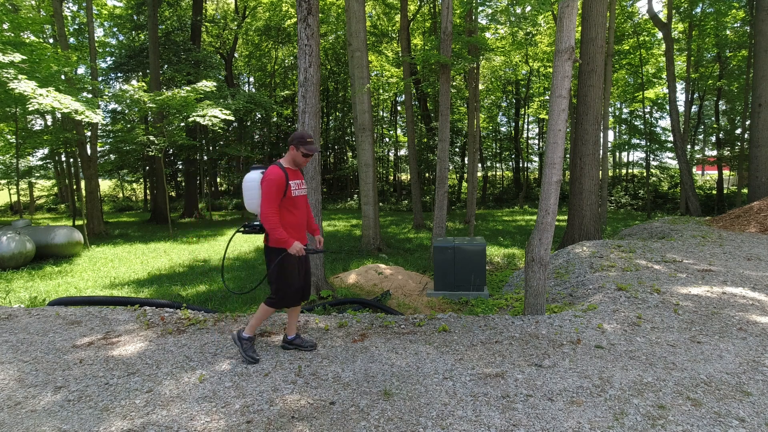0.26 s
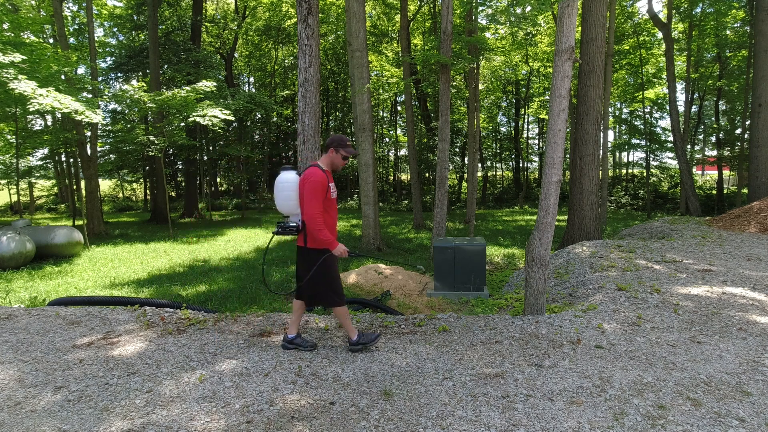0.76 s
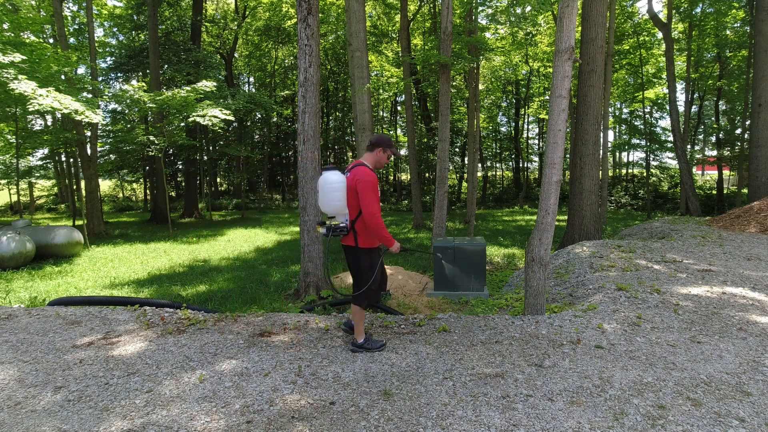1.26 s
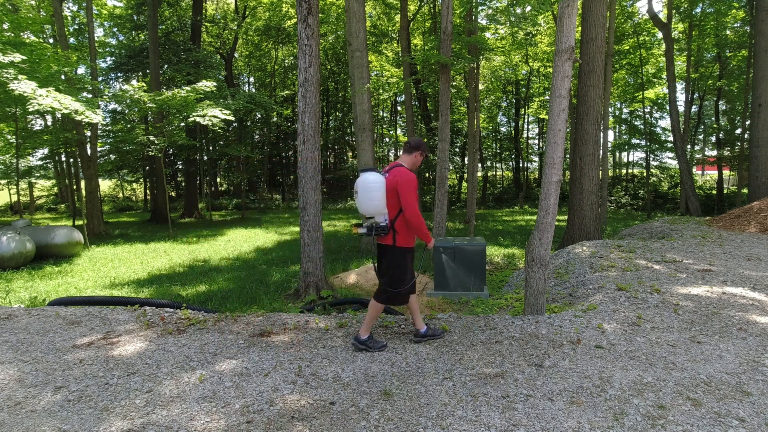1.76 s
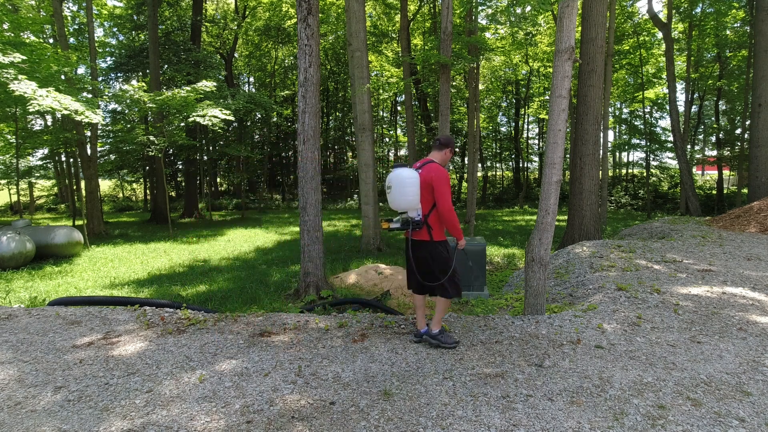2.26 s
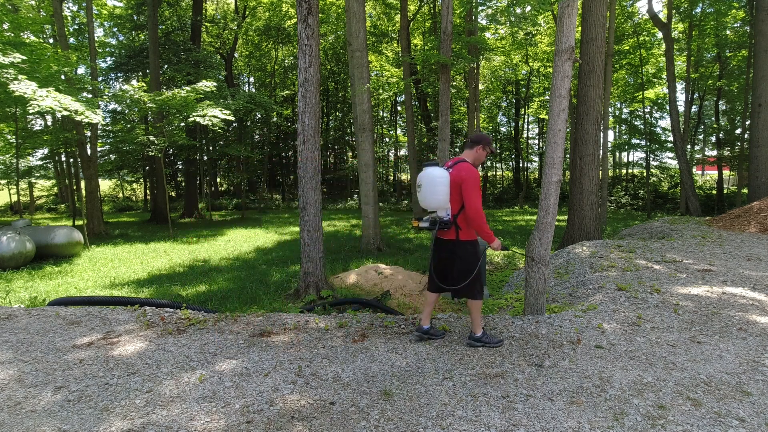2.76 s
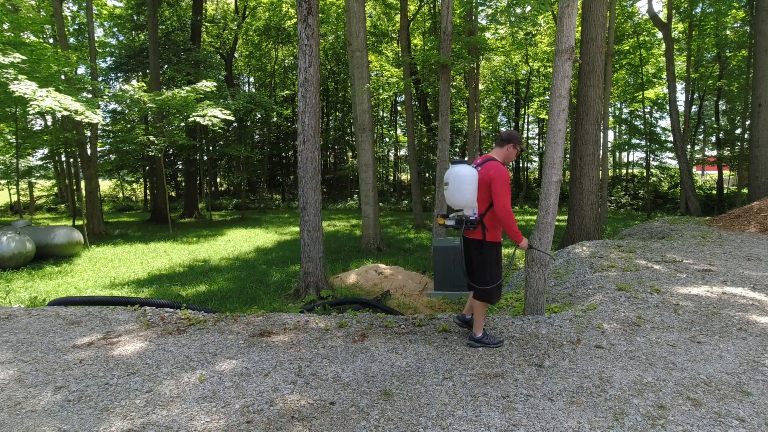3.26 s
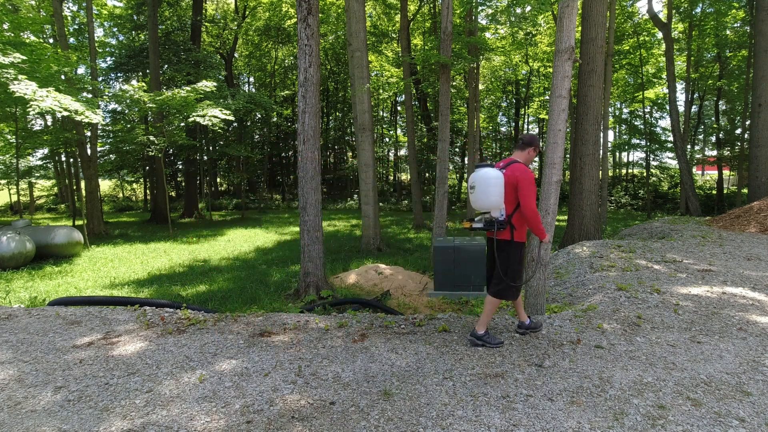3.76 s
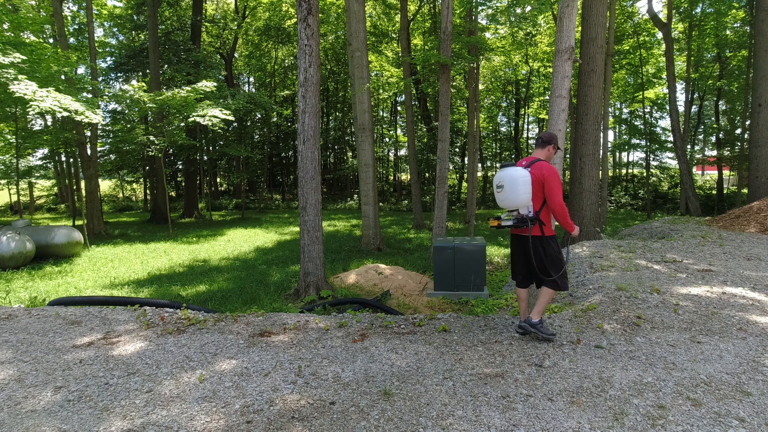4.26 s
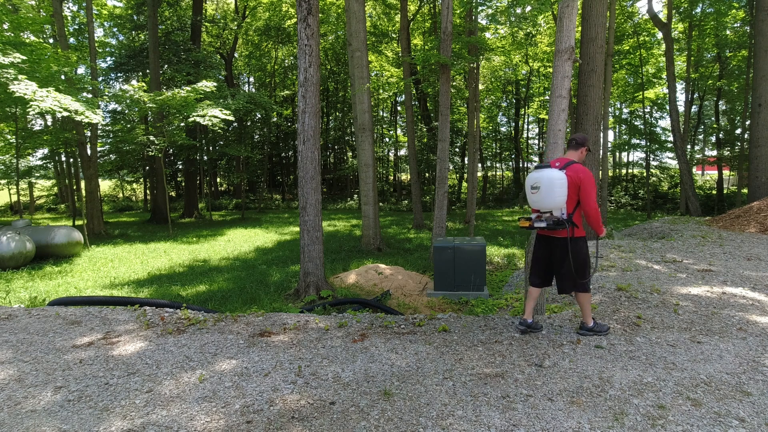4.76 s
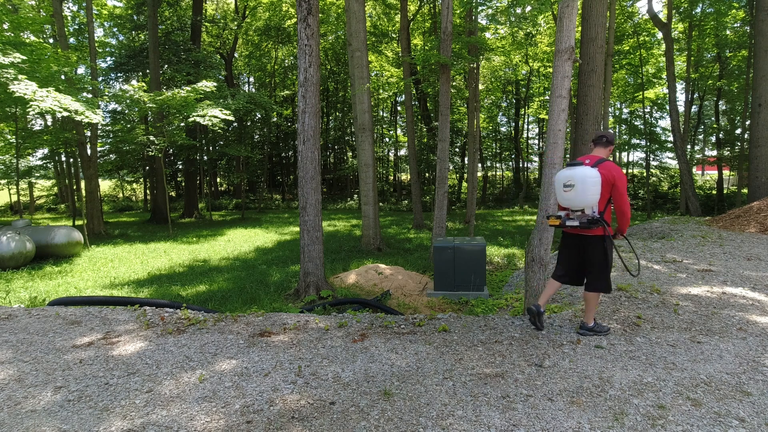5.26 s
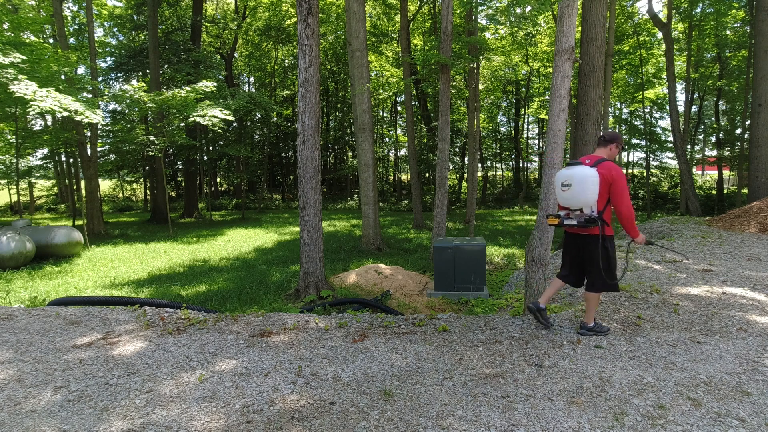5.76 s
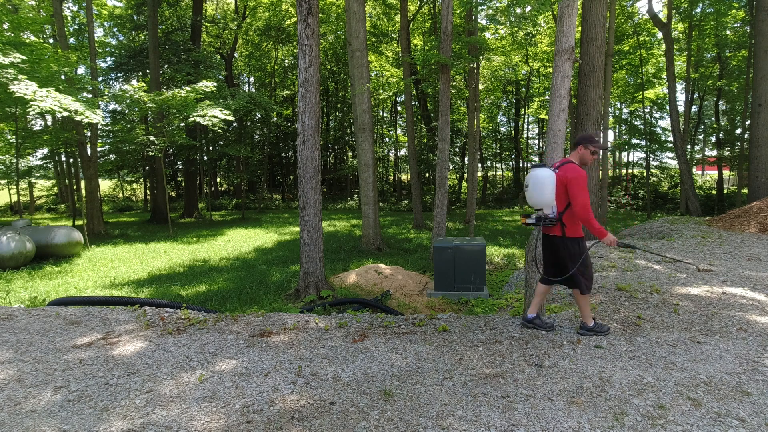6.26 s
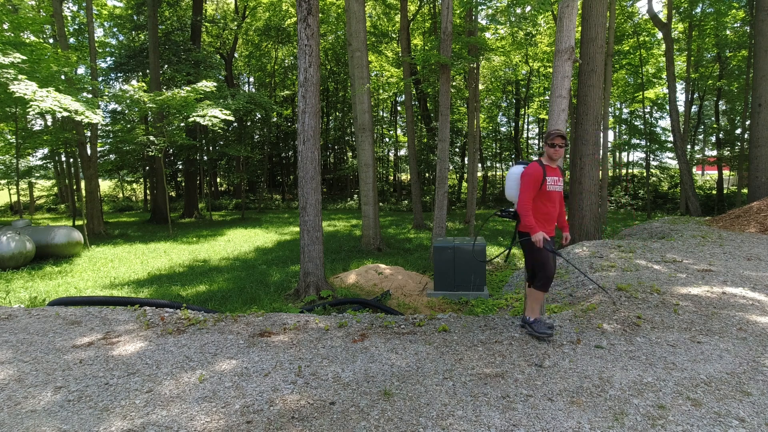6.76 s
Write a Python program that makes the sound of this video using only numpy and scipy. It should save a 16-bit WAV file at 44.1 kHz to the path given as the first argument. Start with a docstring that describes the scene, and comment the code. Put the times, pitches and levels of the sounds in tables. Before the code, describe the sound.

Already running at the start, an electric diaphragm pump drones beside airy, patchy spray. Sharp gravel ticks and grainy scuffs mark walking. The motor drops out for under half a second amid rattling plastic and brief spurts, then resumes, with more knocks as it settles. It finally shuts off together with the hiss, leaving faint low outdoor rumble. Close and dry, with only a slight smeared echo from tree trunks.

```python
"""A small pump hums and spray hisses from the first moment; the pump stops, restarts and stops again.
It sits in a backpack sprayer carried over gravel among trees. Tones tied to its turning shaft make the hum.
Bands of flickering noise make the spray and the distant air, short noise bursts the crunch of shoes.
Short dying rings make the wand and trigger knocks on plastic, clumped clicks the shifting straps."""
import sys
import numpy as np
from scipy import signal
from scipy.io import wavfile
from scipy.ndimage import uniform_filter1d

SR = 44100
rng = np.random.default_rng(int(sys.argv[2]) if len(sys.argv) > 2 else 0)


def to_wav(sig):
    """Store sig (one row per channel, or 1-D mono) as 16-bit WAV at the path in sys.argv[1].

    Samples outside -1..1 are clipped; the rate is SR.
    """
    pcm = np.clip(np.atleast_2d(sig), -1, 1) * 32767
    pcm = np.round(pcm).astype(np.int16)
    wavfile.write(sys.argv[1], SR, pcm.T)  # frames by channels


def convert_level_to_amplitude(level_db):
    """Map a level in decibels to its linear amplitude factor."""
    exponent = np.asarray(level_db, float) / 20
    return 10 ** exponent


N = 309572


def rms_one(x):
    """Scale a sound to an rms of 1."""
    return x / np.sqrt(np.mean(x ** 2) + 1e-20)


def in_time(rows):
    """Draw straight lines between table rows; the first column is t/s."""
    s, *columns = np.transpose(rows)
    return [np.interp(np.arange(N) / SR, s, column) for column in columns]


def at_hz(points, hz):
    """Read a table of (f/Hz, level/dB) at any frequency, along a log scale."""
    table_hz, table_db = np.transpose(points)
    return np.interp(np.log(hz), np.log(table_hz), table_db)


def drift(rate_hz):
    """Slow random wandering of spread 1: noise at every 20th sample, smoothed twice."""
    r = np.exp(-40 * np.pi * rate_hz / SR)
    noise = rng.standard_normal(N // 20 + 3002)
    slow = signal.lfilter([1], [1, -2 * r, r * r], noise)[3000:]  # skip the settling part
    return np.interp(np.arange(N) / 20, np.arange(len(slow)), rms_one(slow - slow.mean()))


def band(x, low_hz, high_hz):
    """Keep the part of a sound between two frequencies."""
    edges_hz = [low_hz, min(high_hz, .45 * SR)]
    return signal.sosfilt(signal.butter(2, edges_hz, "band", fs=SR, output="sos"), x)


def swell(s, half_s):
    """A smooth bump in time."""
    return np.exp(-((np.arange(N) / SR - s) / half_s) ** 2)


def add(out, s, burst):
    """Mix a short sound in at a given second."""
    i = round(s * SR)
    out[..., i:i + burst.shape[-1]] += burst[..., :N - i]


# how wide noise spreads left to right: (f/Hz, level/dB of side over mid)
SIDE_WIDTH = [(2000, -37), (2500, -24), (4400, -0.5), (8100, -10.5), (15000, -5.5)]


def noise_bands(spectrum, edges, flicker_db, flicker_rate, humps=(), lean_db=0):
    """Mid and side noise in bands that flicker separately, shaped by humps; mid rms about 1 each quarter second."""
    out = 0
    white = rng.standard_normal((2, 2, N))
    for k, (low, high) in enumerate(zip(edges, edges[1:])):
        hz = np.sqrt(low * high)
        lift = lean_db * np.log2(hz / 8000)
        for centre, width, db in humps:
            lift = lift + db * np.exp(-(np.log(hz / centre) / width) ** 2)
        gain = convert_level_to_amplitude(at_hz(spectrum, hz) + lift + flicker_db * drift(flicker_rate))
        mid_and_side = convert_level_to_amplitude(np.array([[0], [at_hz(SIDE_WIDTH, hz)]]))
        out = out + gain * band(white[k % 2], low, high) * mid_and_side
    return out / np.sqrt(uniform_filter1d(out[0] ** 2, size=SR // 4))


AIR_DB = -51.5  # mid rms
# colour of far traffic and leaves: (f/Hz, relative level/dB per Hz)
AIR_COLOUR = [(18, -41), (30, -8.5), (86, -5), (113, 2.5), (131, -11.5), (210, -1), (284, -18.5),
              (601, -17.5), (1220, -17.5), (1540, -22), (5000, -45), (6500, -72), (11000, -120)]


def distant_air():
    """Far traffic and leaves blend into a low, gently flickering rumble of noise."""
    edges_hz = np.geomspace(25, 5000, 16)
    return convert_level_to_amplitude(AIR_DB) * noise_bands(AIR_COLOUR, edges_hz, flicker_db=.6, flicker_rate=8.0)


def trees(x, level_db, t60):
    """Trunks scatter a faint, smeared tail of the sound back."""
    t = np.arange(round(.3 * SR)) / SR
    tail = band(rng.standard_normal(len(t)), 564, 3800) * convert_level_to_amplitude(-60 * t / t60) * (t > .015)
    tail = tail / np.sqrt(np.sum(tail ** 2))
    return convert_level_to_amplitude(level_db) * signal.fftconvolve(x, tail)[:N]


# straps and hose shift: (middle t/s, level/dB at the middle, half length t/s)
CREAKS = [(2.499, -38.5, 0.011), (2.6, -47, 0.056), (2.632, -48, 0.03), (2.695, -41.5, 0.016),
          (2.833, -43, 0.04), (3.02, -43, 0.076), (3.153, -45, 0.046), (6.52, -46.5, 0.17)]


def creak():
    """Straps and hose shift on the tank: clumps of dense clicks ring a dull shell."""
    clicks_per_s = 1100 * convert_level_to_amplitude(5.0 * drift(30))
    born = rng.random(N) < clicks_per_s / SR
    strength = convert_level_to_amplitude(2.8 * np.minimum(rng.exponential(1, N), 4))
    clicks = born * strength * rng.choice([-1, 1], N) + 1e-18
    shell = band(clicks, 980, 1120) + 1.4 * band(clicks, 380, 420) + 0.29 * band(clicks, 710, 2500)
    swells = sum(convert_level_to_amplitude(db) * swell(s, half_s) for s, db, half_s in CREAKS)
    return swells * rms_one(shell)


# shoes scuff the gravel: (middle t/s, level/dB before the graininess, half length t/s, centre f/Hz)
SHOE_SCUFFS = [(0.498, -48, 0.085, 7900), (0.732, -45, 0.029, 7400), (1.07, -46, 0.031, 9200),
               (1.208, -50, 0.015, 4300), (1.63, -43, 0.017, 4800), (1.704, -35.5, 0.041, 7840),
               (1.814, -48, 0.13, 5050), (2.108, -50, 0.074, 4230), (2.344, -41.5, 0.088, 4070),
               (3.647, -50.5, 0.095, 7260), (3.716, -45.5, 0.022, 4300), (3.82, -48.5, .04, 4700),
               (3.92, -57, .02, 2600), (3.996, -58, 0.03, 5960), (4.331, -51, 0.12, 5300),
               (4.437, -48, .025, 6550), (5.063, -48.5, 0.097, 3580), (5.395, -40, .05, 8450),
               (5.497, -43, 0.014, 7000), (5.58, -55, .03, 6900), (5.694, -45.5, 0.028, 7100),
               (6.54, -54, .012, 4380)]


def scuffs():
    """Stones grind under a sole: a short swell of grainy noise around its centre, a little wide."""
    out = np.zeros((2, N))
    t = np.arange(SR // 2) / SR - .25
    grain = rms_one(convert_level_to_amplitude(2.5 * drift(150)))
    for s, level_db, half_s, hz in SHOE_SCUFFS:
        noise = rng.standard_normal((2, len(t))) * convert_level_to_amplitude(np.array([[0], [-8.]]))  # mid, side
        body = rms_one(band(noise, hz / 1.2, hz * 1.17)) + .4 * rms_one(band(noise, 2500, 11000))
        add(out, s + t[0], convert_level_to_amplitude(level_db) * body * np.exp(-(t / half_s) ** 2))
    return out * grain


SMALL_TICKS, SMALL_TICK_DB, SMALL_TICKS_END_S = 22, -29, 6.5  # fainter ticks: tries, middle level, last time
# gravel under the shoes, the sharpest ticks: (t/s, level/dB before a 3.5 dB cut, centre f/Hz)
SHARP_TICKS = [(.0777, -22, 8730), (0.444, -19, 6700), (.5586, -17, 8500), (.8543, -17, 8000),
               (1.048, -16, 9850), (1.202, -17.5, 7810), (1.677, -15, 7640), (2.5331, -26.5, 6970),
               (2.595, -29, 5900), (2.695, -20.5, 3360), (2.7635, -17.5, 5900), (3.149, -23.5, 7460),
               (3.811, -14, 4900), (4.124, -23, 7620), (4.146, -28, 7770), (4.867, -24, 5900),
               (5.3023, -29, 6500), (6.5375, -25, 4500), (5.4814, -20, 6800), (5.558, -15.5, 7050)]


def gravel():
    """Each tick is a short crack of noise, coloured around its centre, a little wide."""
    out = np.zeros((2, N))
    t = np.arange(1300) / SR
    small = []
    for when, loudness, pitch in rng.random((SMALL_TICKS, 3)):
        s = when * SMALL_TICKS_END_S
        # fainter ticks are kept only while the pump is switched on
        if any(on_s < s < off_s for on_s, off_s in PUMP_SWITCH):
            small.append((s, SMALL_TICK_DB + 10 * (loudness - .5), 6000 + 3500 * pitch))
    for s, level_db, hz in SHARP_TICKS + small:
        noise = rng.standard_normal((2, len(t))) * convert_level_to_amplitude(np.array([[0], [-8.]]))  # mid, side
        crack = noise * convert_level_to_amplitude(-60 * t / 0.011)
        coloured = band(crack, hz / 1.33, hz * 1.14) + 0.17 * band(crack, 2900, 23000)
        add(out, s, convert_level_to_amplitude(level_db - 3.5) * coloured)
    return out


# soft thumps of tank and hose: (t/s, level/dB before a 2.5 dB cut, ring f/Hz)
SOFT_THUMPS = [(2.465, -32, 760), (2.539, -33, 323), (2.595, -32, 570), (2.7, -27, 690),
               (2.724, -16.5, 675), (3.916, -23, 470)]


def thumps():
    """Tank and hose give a low ring and a puff of noise that die together."""
    out = np.zeros(N)
    t = np.arange(2200) / SR
    for s, level_db, hz in SOFT_THUMPS:
        body = np.sin(2 * np.pi * hz * t) + 1.3 * band(rng.standard_normal(len(t)), 120, 1200)
        add(out, s, convert_level_to_amplitude(level_db - 2.5) * body * convert_level_to_amplitude(-60 * t / 0.045))
    return out


CONTACT_CYCLES = 0.752  # contact lasts this part of a ring cycle
CRACK = .05  # gain of the noise crack
# wand and trigger knock on plastic: (t/s, level/dB before a 6.5 dB boost, ring f/Hz)
PLASTIC_KNOCKS = [(.66, -17.5, 1700), (.678, -17, 1580), (.776, -25, 1690), (2.47, -34, 990),
                  (2.491, -33, 1150), (2.534, -32, 1090), (2.622, -33.5, 1180), (2.641, -37, 1020),
                  (2.666, -38, 900), (2.704, -35, 1360), (2.725, -28.5, 1240), (2.794, -39, 1040),
                  (2.927, -24.5, 1040), (2.974, -16, 1260), (2.993, -36, 1080), (3.008, -39, 1050),
                  (3.056, -28, 1150), (3.068, -30, 1150), (3.1, -29.5, 1300), (3.128, -22, 1170),
                  (3.199, -33, 1100), (4.716, -29.5, 2500), (5.453, -17.5, 2700), (6.327, -33, 1440),
                  (6.753, -41, 1100), (6.832, -49, 1210)]


def knocks():
    """A few cycles of a damped shell that swell during the contact and die, a crack on top."""
    out = np.zeros(N)
    t = np.arange(2200) / SR
    for s, level_db, hz in PLASTIC_KNOCKS:
        u = t * hz / CONTACT_CYCLES  # time in contacts; the swell tops at 2
        shell = np.sin(2 * np.pi * hz * t) + 0.39 * np.sin(2 * np.pi * 0.786 * hz * t)
        crack = CRACK * band(rng.standard_normal(len(t)), 570, 4000)
        shape = np.exp(-(u - 2) ** 2 / np.where(u < 2, 1.5, 4.0))
        start_s = s + 0.001303 - 2 * CONTACT_CYCLES / hz
        add(out, start_s, convert_level_to_amplitude(level_db + 6.5) * (shell + crack) * shape)
    return out


OPEN_S = .004  # the nozzle opens over this time
# the nozzle flows, and spits briefly while the pump rests:
# (open t/s, shut t/s, level/dB, pressure bleeding away in dB/s)
NOZZLE_FLOWS = [(-1, 2.42, 0, 200), (2.532, 2.54, -9, 600), (2.586, 2.622, -2, 500),
                (2.693, 2.705, -12, 600), (2.722, 2.73, -14, 600), (2.767, 6.6, 0, 190)]
# the wand swings: (t/s, hiss level/dB before flow and spatter, lean to the treble in dB per octave,
# bright hump f/Hz, ground-echo dip f/Hz)
WAND_SWING = [(0, -42.5, 3.5, 8440, 6000), (.3, -43.5, 2, 8000, 5000), (.9, -43.5, 2, 8250, 4300),
              (1.1, -41, 4, 9400, 5230), (1.5, -42.5, 4.5, 8500, 6000), (1.9, -40.5, 2, 9000, 11300),
              (2.4, -38.5, 0, 7300, 11500), (2.6, -44.5, -2.5, 7240, 4600), (2.9, -46, 0.5, 8140, 4730),
              (3.4, -47, -2, 8300, 5240), (3.8, -41.5, 2.5, 8600, 6200), (4.15, -46, 0, 7650, 5500),
              (4.5, -45.5, -3.5, 8100, 4800), (5.2, -45, -1, 8700, 4540), (5.5, -38.5, 3, 7450, 4600),
              (5.9, -46, -1, 9000, 4600), (6.2, -48, -2.5, 8500, 5160), (6.5, -45.5, -1, 8550, 5470)]
# colour of the hiss: (f/Hz, relative level/dB per Hz)
HISS_COLOUR = [(1800, 3.5), (2600, 3), (3100, 4), (4300, -2.5), (5300, 2.5), (8500, -1), (9700, -1.5),
               (10800, -11.5)]
# finest droplets: (t/s, level/dB before flow and spatter)
MIST_LEVEL = [(0, -48), (.5, -54), (1.2, -54.5), (2.2, -49.5), (2.9, -60), (4.4, -56), (5.4, -55.5),
              (6.5, -58)]
# colour of the finest droplets: (f/Hz, relative level/dB per Hz)
FINE_COLOUR = [(9500, 2), (12200, -1), (14700, 4.5), (15900, 0)]


def spray():
    """Fine droplets: patchy hiss whose hump and echo dip slide as the wand swings, with a spatter of impacts."""
    hiss_db, lean_db, hump_hz, dip_hz = in_time(WAND_SWING)
    mist_db = in_time(MIST_LEVEL)[0]
    t = np.arange(N) / SR
    flow = 0
    for open_s, shut_s, db, bleed in NOZZLE_FLOWS:
        opening = np.clip((t - open_s) / OPEN_S, 0, 1)
        flow = flow + opening * convert_level_to_amplitude(db - bleed * np.maximum(t - shut_s, 0))
    spatter = rms_one(convert_level_to_amplitude(1.8 * drift(96) + 1.0 * drift(2.2)))
    humps = [(hump_hz, .11, 5.0), (dip_hz, .15, -7.0)]  # (f/Hz, width in log frequency, level/dB)
    hiss = noise_bands(HISS_COLOUR, np.geomspace(1900, 11000, 24), flicker_db=3.0, flicker_rate=6.2,
                       humps=humps, lean_db=lean_db)
    mist = noise_bands(FINE_COLOUR, np.geomspace(9800, 16600, 8), flicker_db=1.5, flicker_rate=3.0,
                       humps=[(12700, 0.059, 5.0)])
    return flow * spatter * (convert_level_to_amplitude(hiss_db) * hiss + convert_level_to_amplitude(mist_db) * mist)


START_S, COAST_S = .024, .052  # fade-in; time to fall 20 dB
RUN_DOWN_TURNS_PER_S2 = 105  # slowing after switch-off
SPIN_UP_LACK_TURNS_PER_S, SPIN_UP_S = 12, .04  # speed missing at the start; time to make it up
UPPER_WAVER_DB = 1.8  # each higher tone wavers in level slowly and at random
VALVE_MULTIPLES, VALVE_DB, VALVE_SPREAD_DB = range(35, 65), -68, 4  # faint uneven tones of the valves
# each run's switch: (on t/s, off t/s)
PUMP_SWITCH = [(-1, 2.358), (2.776, 6.61)]
# crank angle where each run is first heard: one value a run [turns]
FIRST_TURN = [.774, .537]
# each run as the wearer walks and turns: (t/s, nearness level/dB,
# facing: swing of the tank-wall tone level/dB, body shading of the motor whine level/dB)
PUMP_RUNS = [
    [(0, -1.5, 1, 0), (.15, 0.5, -2, -2.5), (.45, 1.5, -3, -1), (.71, 0, -3, 0.5), (1.1, -0.2, -4, -2),
     (1.45, 1, 2, 0), (1.8, 2, 0, 2), (2, 3.5, -1, -0.5), (2.2, 2, 1, 0), (2.35, 1.5, 2.5, -1.5)],
    [(2.85, -4, -.5, 0), (3.1, -1.5, -1.5, -1), (3.45, -0.1, -0.5, -0.5), (3.94, 1.5, -1, 0),
     (4.4, 0.5, 0.5, 0), (4.65, 0.5, -5, -1.5), (4.95, 1.5, -3.5, 0), (5.25, 1, -1.5, 0.5),
     (5.5, 0.5, -0.5, 1.5), (5.9, -2.5, 0, -2), (6.3, -3.5, 3, -3), (6.48, -3.5, 3.5, -5),
     (6.6, -6, 7.5, -3)],
]
# shaft speed under load in each run: (t/s, speed in turns/s)
SHAFT_SPEED = [
    [(0, 40.75), (1, 40.77), (1.4, 40.65), (2.355, 40.63)],
    [(3.2, 39.72), (4, 39.89), (4.9, 39.86), (5.2, 39.71), (5.8, 39.6), (6.6, 39.56)],
]
# tones on or close to multiples of the shaft speed;
# two strokes a turn favour the even ones, the tank wall beams the tenth:
# (multiple, level/dB in the faster run, level/dB in the slower run, dB per dB of facing);
# nearness, facing, shading and waver move these levels
SHAFT_TONES = [(2, -47, -50.5, -0.46), (3.996, -38, -39, -0.32), (5, -49, -49, 0.1),
               (6.015, -35, -35, -0.16), (7, -49, -44.5, 0.24), (8, -39, -42.5, -0.15),
               (9, -46.5, -44.5, 0.5), (10, -35.5, -32.5, 1), (11, -38, -40.5, 0), (12, -31.5, -28, -0.07),
               (13, -40, -41.5, 0.7), (14, -47, -39.5, 0.6), (15, -68.5, -70.5, -4.5),
               (15.86, -52.5, -55.5, 0.4), (19, -51, -52, -0.2), (20, -49.5, -53, 0.4),
               (21, -67, -53.5, 1.3), (21.92, -45.5, -47, -1.15), (23, -57, -51, 0.8),
               (24.1, -51.5, -51.5, -1.4), (24.97, -40, -39.5, -0.27), (27, -50.5, -48, 0.3),
               (28, -57, -54, -0.9), (29, -62, -64, 1), (30, -62.5, -56.5, 2), (32.26, -54, -61.5, 1.9),
               (33, -62.5, -58, -1)]
# how late each part sounds, a row for multiples whose whole part is even, then one for odd:
# (low hum, housing ring, whine, valves) [turns]
PART_LAG = [(.03, .21, .3, .1), (.07, .19, .36, .1)]
# grit of uneven strokes: (low f/Hz, high f/Hz, level/dB before nearness, facing and shading, dB per dB of facing)
STROKE_GRIT = [(110, 325, -57, -0.5), (352, 573, -51.5, 0.8), (667, 1350, -48.5, 0.2),
               (1450, 3790, -53, 0.2)]


def pump(which, waver_db, rasp_depth):
    """Tones locked to the shaft; uneven strokes add grit between them and the valves rasp on each stroke."""
    near_db, facing_db, shade_db = in_time(PUMP_RUNS[which])
    t = np.arange(N) / SR
    on_s, off_s = PUMP_SWITCH[which]
    coasting = np.maximum(t - off_s, 0)
    # after switch-off the pressure stalls it ever faster
    on = np.clip((t - on_s) / START_S, 0, 1) * convert_level_to_amplitude(-20 * (coasting / COAST_S) ** 2.2)
    spin_up_lack = SPIN_UP_LACK_TURNS_PER_S * np.clip(1 - (t - on_s) / SPIN_UP_S, 0, 1)
    speed = in_time(SHAFT_SPEED[which])[0] - RUN_DOWN_TURNS_PER_S2 * coasting - spin_up_lack
    turn = 2 * np.pi * (FIRST_TURN[which] + np.cumsum(speed * (t >= on_s)) / SR)
    slack = [0, 0, 0.0055 * drift(3.3), 0.023 * drift(3.6)]  # loose parts do not keep exact time
    valve_db = rng.normal(VALVE_DB, VALVE_SPREAD_DB, len(VALVE_MULTIPLES))
    valve_tones = [(k, db, db, 0) for k, db in zip(VALVE_MULTIPLES, valve_db)]
    out = 0
    for k, *level_db, beam in SHAFT_TONES + valve_tones:
        part = np.searchsorted([8.5, 15.5, 34.5], k)  # hum, housing, whine or valves
        late = turn - 2 * np.pi * PART_LAG[int(k) % 2][part] + slack[part]
        high = k > 14.5
        waver = (UPPER_WAVER_DB if high else waver_db) * drift(1.3)
        swing_db = beam * facing_db + waver + high * shade_db
        sign = 1 if part == 1 else -1  # the housing swings against the diaphragm
        out = out + sign * convert_level_to_amplitude(level_db[which] + swing_db) * np.cos(k * late)
    strokes = 1 + rasp_depth * np.cos(2 * turn - 1.2) + 0.015 * np.cos(turn)
    for low_hz, high_hz, level_db, beam in STROKE_GRIT:
        grit = rms_one(strokes * band(rng.standard_normal(N), low_hz, high_hz))
        out = out + convert_level_to_amplitude(level_db + beam * facing_db + (low_hz > 500) * shade_db) * grit
    return on * convert_level_to_amplitude(near_db) * out


def scene():
    """Add the air, shoes and spray in stereo to the pump, knocks and creaks in the middle."""
    mid, side = distant_air() + scuffs() + gravel() + spray()
    hum = sum(pump(which, waver_db=0.96, rasp_depth=0.17) for which in range(len(PUMP_RUNS)))
    near = creak() + thumps() + knocks() + hum
    mid = mid + near + trees(near, level_db=-19, t60=.3)
    # close capsules hear the bass alike
    side = signal.sosfilt(signal.butter(6, 2100, "high", fs=SR, output="sos"), side)
    return np.array([mid + side, mid - side])


def top_cut(x):
    """Nothing passes above the cut-off."""
    return signal.sosfilt(signal.butter(12, 16340, fs=SR, output="sos"), x)


def record(dry):
    """The microphone hisses faintly, and the very top and bottom are cut."""
    hiss = convert_level_to_amplitude(-70) * band(rng.standard_normal(dry.shape), 3000, 19000)
    mix = signal.sosfilt(signal.cheby2(18, 55, 16100, fs=SR, output="sos"), dry + hiss)
    mix = signal.sosfilt(signal.butter(2, 50, "high", fs=SR, output="sos"), mix)
    return top_cut(mix)


dry = scene()
out = record(dry)
to_wav(out)
```